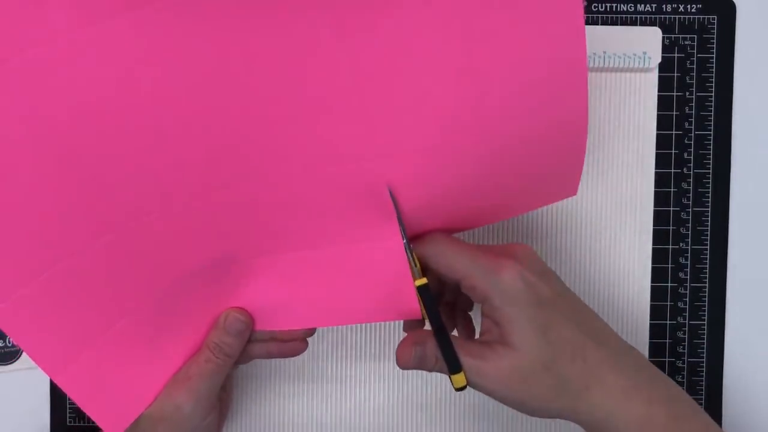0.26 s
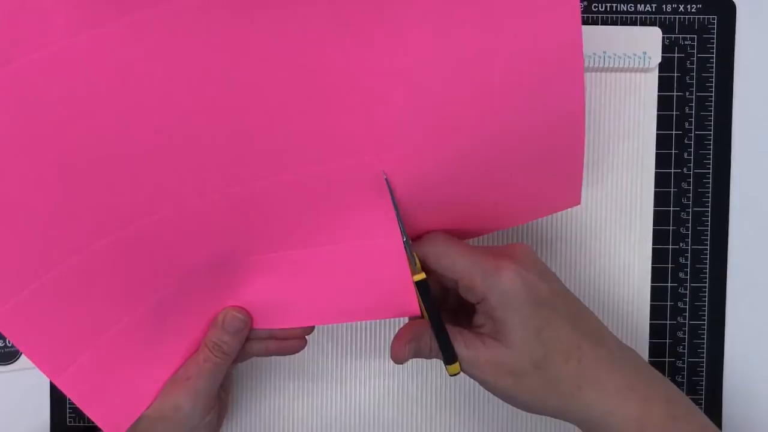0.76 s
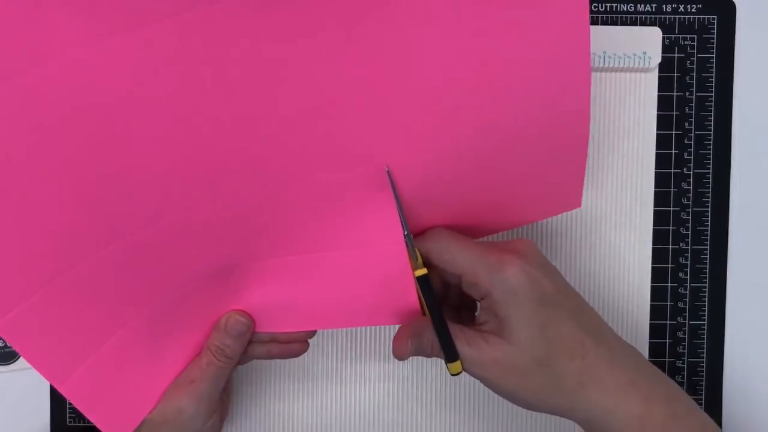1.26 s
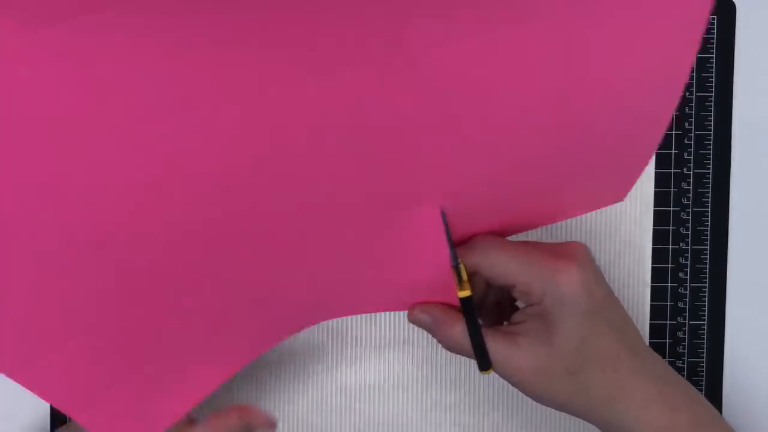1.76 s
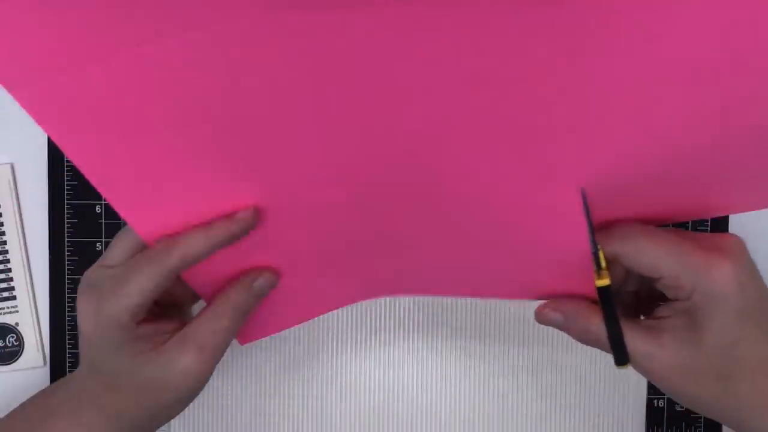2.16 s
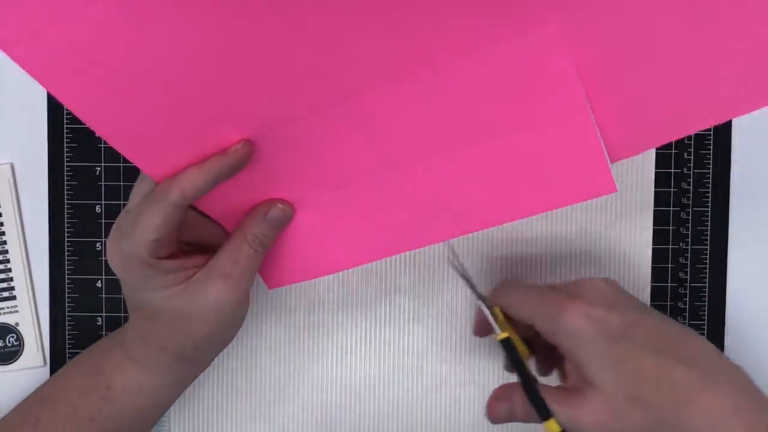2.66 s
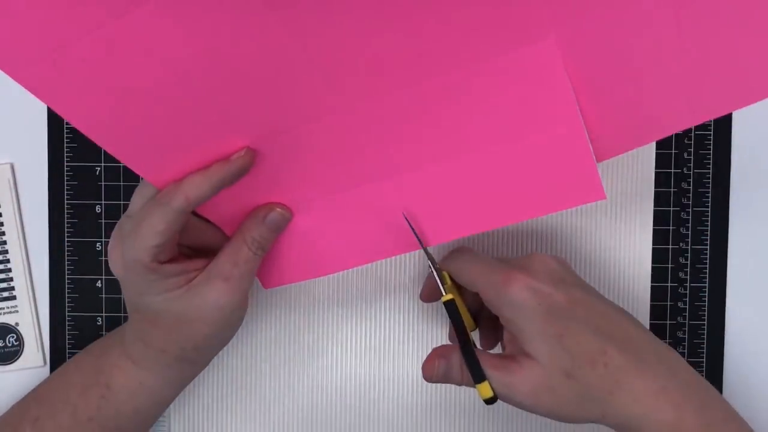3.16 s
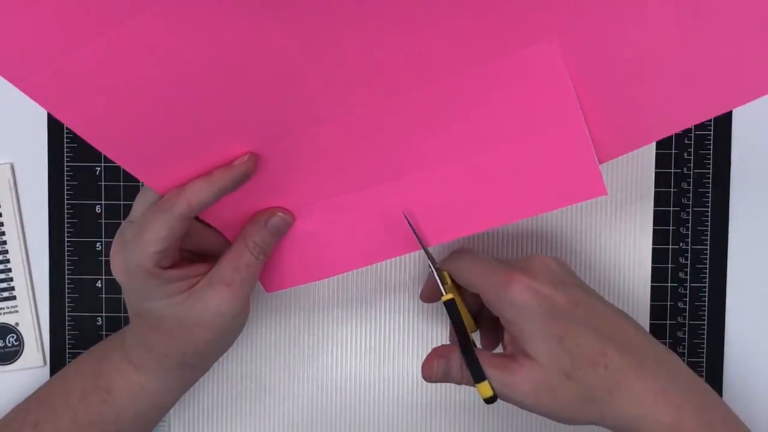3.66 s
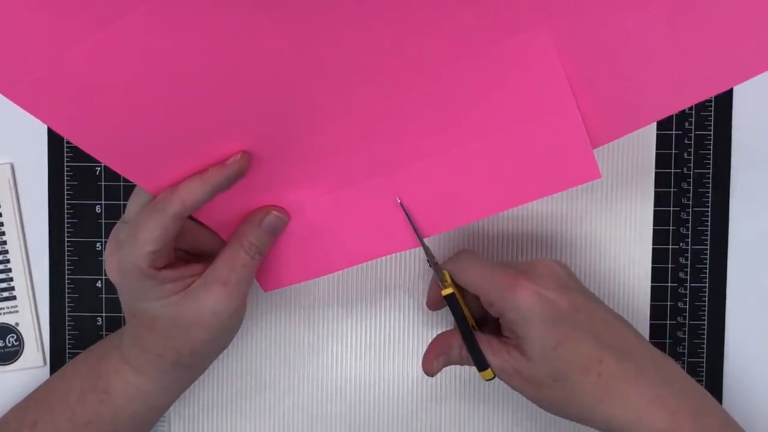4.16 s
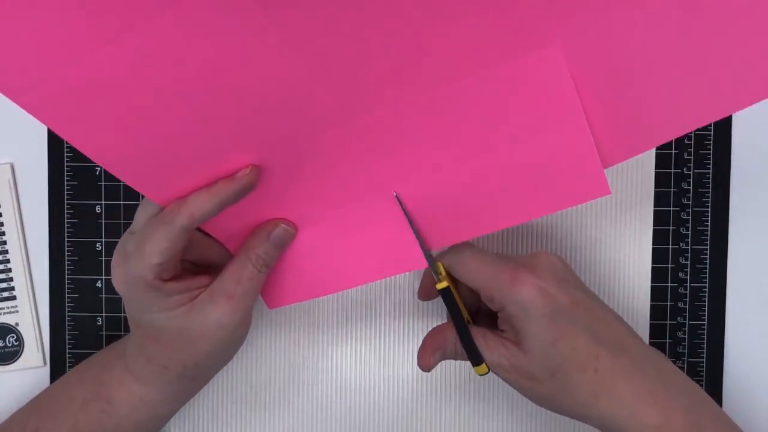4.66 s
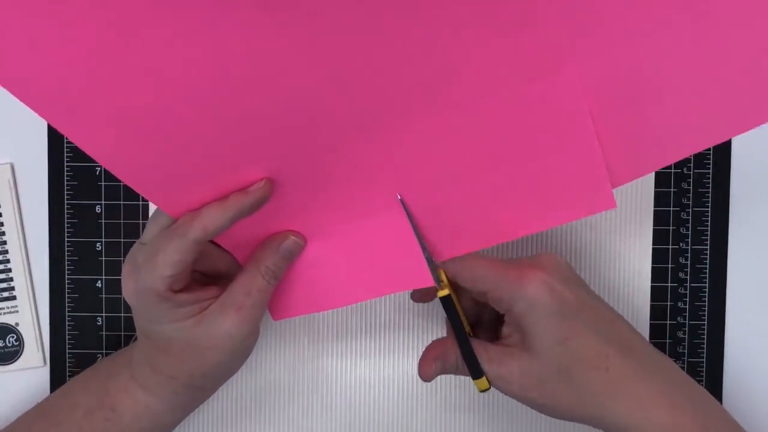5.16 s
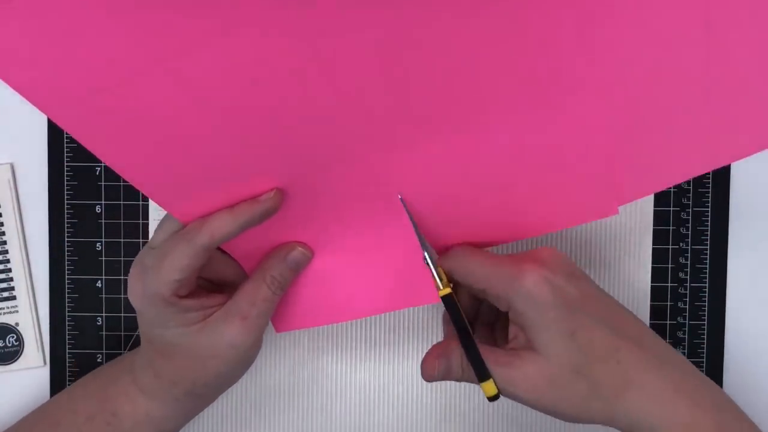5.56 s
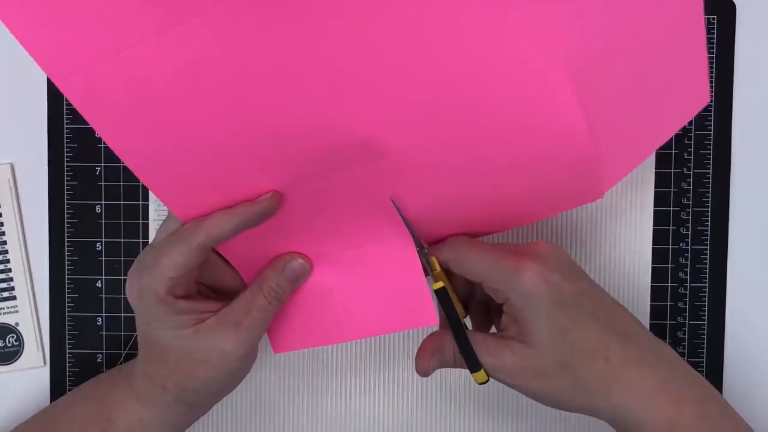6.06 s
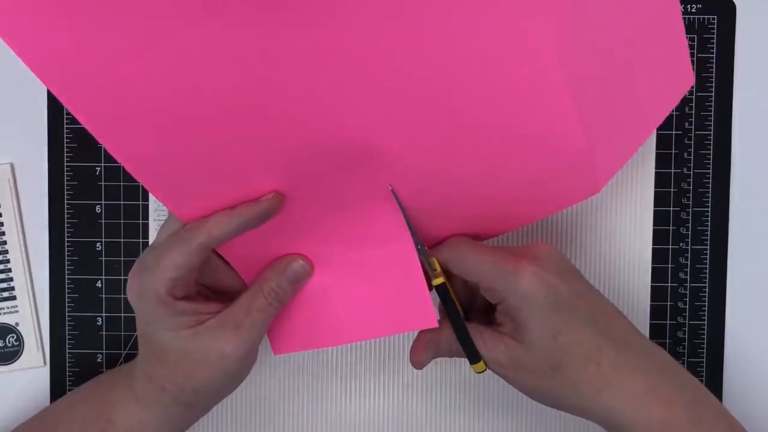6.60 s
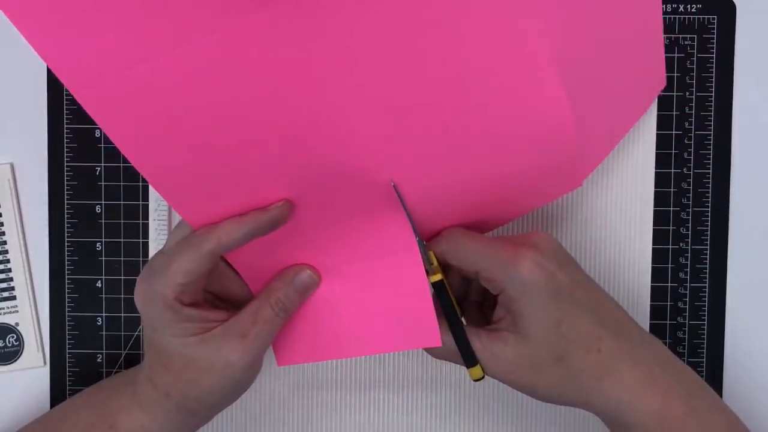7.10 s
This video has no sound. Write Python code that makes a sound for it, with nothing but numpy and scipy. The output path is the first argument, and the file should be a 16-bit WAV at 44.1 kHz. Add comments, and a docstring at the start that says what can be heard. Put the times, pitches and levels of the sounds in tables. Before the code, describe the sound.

Small scissors snip through stiff cardstock in short crunchy cuts, the sheet rustles and flaps as it is turned, then more snips, over faint hum.

```python
"""A craft table in a small room: small scissors cut a sheet of cardstock, heard close.
Cuts are filtered trains of fibre clicks; louder snaps add noise bursts and short bending waves of the sheet.
Between cuts the blades rub along the paper: coloured grain with blade resonances, scrapes and ringing clinks.
The sheet rustles as it is turned, its edge sings in narrow bands, and it flaps down and pops as it buckles.
A mains hum and a faint rush of air run underneath."""
import sys
import numpy as np
from scipy import signal
from scipy.fft import rfft, irfft
from scipy.io import wavfile
from scipy.ndimage import uniform_filter1d, map_coordinates

SR = 44100
rng = np.random.default_rng(int(sys.argv[2]) if len(sys.argv) > 2 else 0)


def int16_out(signal):
    """Quantize to a 16-bit WAV file."""
    q = np.round(np.clip(np.atleast_2d(signal).T, -1, 1) * 32767)
    wavfile.write(sys.argv[1], SR, q.astype(np.int16))


N = 323473
TIME = np.arange(N) / SR

# closing strokes of the blades: start_s, end_s, first_level_db, last_level_db
CUTS = [(0.796, 0.873, -37, -39.5), (1.379, 1.479, -38.5, -35), (1.521, 1.558, -32.5, -29.5),
        (4.02, 4.293, -54, -41.5), (4.613, 4.759, -46, -41.5), (5.082, 5.183, -42, -42.5),
        (6.575, 6.71, -45, -43)]
# relative spectrum of the paper's hiss: freq_hz, gain_db
HISS_SPECTRUM = [(1500, -32.5), (3800, 9.5), (6100, 10), (8500, 2), (12000, -0.5), (15500, -5)]


def undb(db):
    """Decibels to gain."""
    return 10 ** (np.asarray(db) / 20)


def unit(x):
    """Scale to rms 1."""
    return x / np.sqrt(np.mean(x ** 2))


def add(track, start_s, sound):
    """Mix a short sound in at start_s."""
    i = max(int(start_s * SR), 0)
    track[i:i + len(sound)] += sound[:N - i]


def colour(x, points):
    """Minimum-phase filter through (freq_hz, gain_db) points, made by folding the cepstrum."""
    point_hz, point_db = np.transpose(points)
    size = 4096
    log_hz = np.log(np.fft.rfftfreq(size, 1 / SR) + 1)
    log_gain = np.log(undb(np.interp(log_hz, np.log(point_hz), point_db)))
    cepstrum = irfft(log_gain)[:size // 2]
    cepstrum[0] /= 2
    impulse = irfft(np.exp(rfft(2 * cepstrum, size)))[:size // 2]
    return signal.fftconvolve(x, impulse)[:len(x)]


def ring(x, modes):
    """Decaying modes (freq_hz, t60_s, gain_db) driven by x, scaled to the level of x."""
    t = TIME[:SR // 4]
    body = sum(undb(db - 60 * t / t60_s) * np.sin(2 * np.pi * hz * t) for hz, t60_s, db in modes)
    return unit(signal.fftconvolve(x, body)[:N]) * np.std(x)


def walk(rate_hz):
    """Smoothed random steps with rms 1."""
    k = max(int(SR / rate_hz), 2)
    steps = np.repeat(rng.standard_normal(N // k + 1), k)
    return unit(uniform_filter1d(steps, k)[:N])


def fibres(rate_hz, spread_db, slip_rate_hz, slip_db):
    """Tiny clicks of paper fibres, their strength modulated by stick and slip."""
    clicks = (rng.random(N) < rate_hz / SR) * rng.choice([-1, 1], N)
    strength_db = spread_db * np.minimum(rng.exponential(size=N), 4)
    return clicks * undb(strength_db + slip_db * np.tanh(walk(slip_rate_hz)))


def flex(hz, rise_cycles, sag):
    """Bending wave in the sheet: swells and dies in a few cycles, higher notes first if sag > 0."""
    cycles = TIME[:SR // 25] * hz
    rise = cycles / rise_cycles
    phase = cycles * (1 - sag) + 2 * sag * rise_cycles * (1 - np.exp(-rise / 1.52))
    return (rise * np.exp(1 - rise)) ** 2 * np.sin(2 * np.pi * phase)


def nearness(s):
    """Nearness of the blades to the free edge of the sheet at time s, 0-1."""
    # time_s, nearness
    edge_points = [(2.4, 0.1), (2.9, 0.7), (5.2, 1), (6.6, 0.58)]
    return np.clip(np.interp(s, *np.transpose(edge_points)), 0, 1)


def stroke_gain(t, start_s, peak_s, end_s, bow=1):
    """Rubbing stroke: builds to its peak (late if bow is high), then dies ever faster, -12 dB at end_s."""
    rise = np.clip((t - start_s) / max(peak_s - start_s, .002), 0, 1)
    fall = np.maximum(t - peak_s, 0) / max(end_s - peak_s, .005)
    return rise ** bow * undb(-12 * np.minimum(fall, 4) ** 1.85)


def rubs(strokes, spectrum, grain, scatter, bow, scatter_s=0.0028):
    """Friction strokes; the bend of the card shifts the spectrum and gives each its own small resonances."""
    out, hiss = np.zeros(N), unit(colour(grain, HISS_SPECTRUM))
    t = TIME[:SR // 80]
    for start_s, peak_s, end_s, level_db, centre_hz, hiss_db in strokes:
        span = slice(max(int(start_s * SR), 0), int((2 * end_s - peak_s + 0.0069) * SR))
        # the lows follow the bend of the card, the highs stay put
        shifted = [(f * (centre_hz / 1500) ** (1 / (1 + (f / 3000) ** 2)), d) for f, d in spectrum]
        body = unit(colour(grain[span], shifted))
        stroke = undb(level_db) * body + undb(hiss_db) * hiss[span]
        stroke = stroke * stroke_gain(TIME[span], start_s, peak_s, end_s, bow)
        echoes = rng.standard_normal(len(t)) * np.exp(-t / scatter_s)
        echoes /= np.linalg.norm(echoes)
        add(out, start_s, stroke)
        add(out, start_s, scatter * signal.fftconvolve(stroke, echoes))
    return out


def bend(x, depth_db, rate_hz):
    """The card bends as it moves, so narrow bands swell and fade on their own."""
    size = 512
    overlap = size * 3 // 4
    hz, t, frames = signal.stft(x, SR, nperseg=size, noverlap=overlap)
    field = rng.standard_normal((64, 512))  # random gains over pitch and time
    place = np.meshgrid(6 * np.log2(1 + hz / 700), t * rate_hz, indexing="ij")
    gain = undb(depth_db * map_coordinates(field, place, mode="mirror"))
    shaped = signal.istft(frames * gain, SR, nperseg=size, noverlap=overlap)[1]
    return unit(shaped[:N]) * np.std(x)


def background():
    """Slowly wavering mains hum over the faint rush of the room; both dip briefly in the pause."""
    # hum partials: freq_hz, gain_db
    hum_partials = [(119.9, -61.5), (219, -75)]
    # relative spectrum of the rush: freq_hz, gain_db
    air_spectrum = [(25, -61), (50, -18.5), (140, -8), (400, -13), (1150, -23), (2100, -37.5), (15500, -64)]
    # background dip: time_s, gain_db
    dip = [(3.3, -0.5), (3.7, -13.5), (3.95, 1.5)]
    hum = np.zeros(N)
    for hz, db in hum_partials:
        tone = np.sqrt(2) * np.sin(2 * np.pi * (hz * TIME + rng.random()))
        hum += undb(db + .4 * walk(1.7)) * tone
    air = undb(-64.5) * unit(colour(rng.standard_normal(N), air_spectrum))
    return (hum + air) * undb(np.interp(TIME, *np.transpose(dip)))


def room(x, wet_db=-10.0, t60_mid_s=0.57, t60_broad_s=0.25, build_s=0.019):
    """Diffuse noise tail of a small room; the middle range outlasts the rest."""
    t = TIME[:int(.7 * SR)]
    noise = rng.standard_normal(len(t))
    # the hard walls return mostly the middle range
    mid = signal.sosfilt(signal.butter(1, [1200, 6500], "band", fs=SR, output="sos"), noise)
    mid = signal.sosfilt(signal.butter(8, 6300, fs=SR, output="sos"), mid)
    broad = undb(4.0) * rng.standard_normal(len(t))
    tail = mid * undb(-60 * t / t60_mid_s) + broad * undb(-60 * t / t60_broad_s)
    tail *= 1 - np.exp(-t / build_s)
    return undb(wet_db) * np.std(x) * unit(signal.fftconvolve(x, tail)[:N])


def handling():
    """The sheet flexes with a hollow, shifting rustle as it is turned and moved."""
    # relative spectrum of the rustling sheet: freq_hz, gain_db
    sheet_spectrum = [(60, -52), (150, -5), (480, 3), (800, 1), (1500, 1.5), (2300, -2), (4500, -25),
                      (11000, -52)]
    # rustle of the turning sheet: time_s, body_level_db, treble_level_db
    turn_levels = [(1.72, -66, -80), (1.846, -45, -58), (1.878, -61.5, -75.5), (1.912, -62.5, -60),
                   (1.968, -61, -65.5), (2.002, -68.5, -93), (2.022, -51.5, -57.5), (2.048, -53.5, -65),
                   (2.098, -62.5, -77.5), (2.23, -54, -63), (2.258, -55.5, -73.5), (2.352, -56, -72.5)]
    # hands shift the sheet and let it flap down:
    # start_s, length_s, level_db, centre_hz, hiss_re_level_db
    rustles = [(0, 0.34, -62, 826, -15.5), (0.195, 0.12, -52, 643, -27.5), (2.277, 0.086, -53.5, 520, -14),
               (2.385, 0.056, -38.5, 1073, -18), (2.437, 0.021, -46.5, 1620, -3),
               (2.543, 0.039, -58, 547, -40)]
    peak_share = 0.46
    grain = fibres(rate_hz=5500, spread_db=2.5, slip_rate_hz=140, slip_db=-0.5)
    creases = fibres(rate_hz=2800, spread_db=2.0, slip_rate_hz=93, slip_db=4.0)
    times_s, body_db, treble_db = np.transpose(turn_levels)
    turning = (TIME > times_s[0]) * (TIME < times_s[-1])
    body = undb(np.interp(TIME, times_s, body_db)) * unit(colour(creases, sheet_spectrum))
    treble = undb(np.interp(TIME, times_s, treble_db)) * unit(colour(creases, HISS_SPECTRUM))
    turn = turning * (body + treble)
    strokes = [(s, s + peak_share * length_s, s + length_s, db, hz, db + hiss_db)
               for s, length_s, db, hz, hiss_db in rustles]
    moved = rubs(strokes, sheet_spectrum, grain, scatter=0.47, bow=0.36)
    return bend(moved + turn, depth_db=3.5, rate_hz=38)


def skims():
    """Card edge drawn over a fine texture: a narrow, grainy band that follows the speed of the hand."""
    # start_s, length_s, level_db, first_hz, last_hz, width_over_first_hz
    skim_strokes = [(1.922, 0.066, -49.5, 2400, 1482, 0.6), (2.073, 0.17, -57, 4220, 4080, 0.3),
                    (2.366, .06, -37, 1143, 826, 0.26), (2.936, 0.15, -56, 2010, 1359, .35),
                    (4.42, 0.087, -39.5, 1472, 1310, 0.69)]
    peak_share = 0.6
    out, waver = np.zeros(N), 1 + 0.033 * walk(45)
    grain = fibres(rate_hz=13000, spread_db=0.0, slip_rate_hz=140, slip_db=1.5)
    for start_s, length_s, level_db, first_hz, last_hz, width in skim_strokes:
        end_s = start_s + length_s
        span = slice(int(start_s * SR), int((start_s + 1.8 * length_s) * SR))
        t = TIME[span]
        hz = np.interp(t, [start_s, end_s], [first_hz, last_hz]) * waver[span]
        lowpass = signal.butter(2, width * first_hz / 2, fs=SR, output="sos")
        band = signal.sosfilt(lowpass, grain[span])
        tone = unit(band * np.sin(2 * np.pi * np.cumsum(hz) / SR))
        gain = stroke_gain(t, start_s, start_s + peak_share * length_s, end_s, bow=.6)
        add(out, start_s, undb(level_db) * tone * gain)
    return out


def flutter():
    """The loose sheet slaps the table in quick, uneven, fading flaps, each with a higher wave on top."""
    start_s, median_gap_s = 2.496, 0.015
    first_db, fade_db_per_s, median_hz = -38, 89, 486
    out, s = np.zeros(N), start_s
    for gap, size, detune, overtone in rng.standard_normal((18, 4)):
        db = first_db - fade_db_per_s * (s - start_s) + 2 * size
        low_hz = median_hz * np.exp(.3 * detune)
        high_hz = 2.3 * median_hz * np.exp(.3 * overtone)
        add(out, s, undb(db) * flex(low_hz, rise_cycles=.8, sag=0.18))
        add(out, s, undb(db - 7) * flex(high_hz, rise_cycles=.9, sag=0.18))
        s += median_gap_s * np.exp(.5 * gap)
    return out


def pops():
    """The stiff sheet flips through a buckle with a click and one short falling note."""
    # sheet buckles or is bumped: time_s, peak_db, pitch_hz, click_db
    buckles = [(1.85, -44, 1350, -34.5), (1.976, -37.5, 1050, -57), (2.3668, -29, 1105, -42),
               (2.502, -33.5, 354, -49), (3.334, -52.5, 860, -58), (3.783, -55, 1040, -62.5),
               (4.974, -27, 1894, -67), (5.2842, -25.5, 920, -27.5), (5.3876, -30, 806, -42),
               (5.965, -33.5, 1150, -56), (6.0608, -28, 830, -48), (6.2149, -31, 1150, -62),
               (6.977, -38.5, 1550, -64)]
    out = np.zeros(N)
    for s, peak_db, hz, click_db in buckles:
        add(out, s, undb(peak_db) * flex(hz, rise_cycles=0.97, sag=0.29))
        add(out, s - .0004, undb(click_db) * flex(hz * 2.7, rise_cycles=0.94, sag=0.31))
    return out


def clinks():
    """Steel knocks on steel and the scissors ring in decaying modes."""
    # blade knocks: time_s, level_db
    knocks = [(2.367, -34.5), (5.722, -31), (5.738, -34.5)]
    # free ring of the scissors: freq_hz, t60_s, gain_db
    scissor_modes = [(889, .1, -3.5), (2070, 0.06, -4.5), (2290, 0.045, -3.5), (6300, 0.057, -25.5)]
    out, t = np.zeros(N), TIME[:SR // 4]
    for s, level_db in knocks:
        tone = np.zeros(len(t))
        for hz, t60_s, db in scissor_modes:
            tone += undb(db - 60 * t / t60_s) * np.sin(2 * np.pi * (hz * t + rng.random()))
        onset = 1 - np.exp(-t / .001)
        add(out, s, undb(level_db) * tone / np.abs(tone).max() * onset)
    return out


def slides():
    """Steel rubs on steel and the cut edge: a rasp that rings the blades; glides swell, scrapes start fast."""
    # relative spectrum of the rasp: freq_hz, gain_db
    rasp_spectrum = [(60, -39.5), (250, -7), (700, 1), (1200, 4.5), (2500, -1), (3600, -8), (5200, -20.5),
                     (6400, -32), (9000, -52)]
    # blades open or glide on along the slit: start_s, length_s, level_db, centre_hz, hiss_re_level_db
    glide_strokes = [(0.711, 0.098, -51, 942, -16.5), (0.963, 0.079, -48.5, 1100, -12.5),
                     (1.164, 0.083, -59, 1300, -20), (3.816, 0.29, -47.5, 1540, -27),
                     (4.355, 0.17, -44.5, 1650, -13.5), (4.838, 0.14, -43, 1746, -21),
                     (5.425, 0.12, -53, 1630, -18), (5.703, 0.05, -45, 1406, -14),
                     (5.88, 0.089, -57.5, 1940, -10.5), (6.477, 0.044, -50, 1490, -18),
                     (6.856, 0.13, -53, 1550, -16), (6.937, 0.25, -56.5, 1310, -13.5)]
    # a blade catches on the card and scrapes off it: start_s, length_s, level_db, centre_hz
    scrape_strokes = [(0.422, 0.08, -60.5, 740), (2.361, 0.025, -34, 1188), (2.927, 0.15, -49, 2486),
                      (3.09, 0.044, -57, 2390), (3.167, 0.022, -55.5, 2190), (5.278, 0.041, -45, 1200),
                      (5.39, 0.018, -48.5, 1500), (6.08, 0.15, -59, 1326), (6.203, 0.035, -43, 1020),
                      (6.427, 0.025, -56.5, 1126)]
    # sliding blade resonances: freq_hz, t60_s, gain_db
    blade_modes = [(1550, 0.011, -5), (2150, 0.026, -2), (2220, 0.019, 2.5)]
    glide_peak_share, scrape_attack_s, scrape_hiss_db = 0.48, 0.0042, -24
    glides = [(s, s + glide_peak_share * length_s, s + length_s, db, hz, db + hiss_db)
              for s, length_s, db, hz, hiss_db in glide_strokes]
    scrapes = [(s, s + scrape_attack_s, s + length_s, db, hz, db + scrape_hiss_db)
               for s, length_s, db, hz in scrape_strokes]
    grain = fibres(rate_hz=8000, spread_db=3.0, slip_rate_hz=280, slip_db=4.0)
    rasp = rubs(glides + scrapes, rasp_spectrum, grain, scatter=0.5, bow=0.6)
    return bend(rasp + undb(-13) * ring(rasp, blade_modes), depth_db=2, rate_hz=30)


def snaps(crack_s=0.0025, lead_s=0.0028, rebound_s=0.00328, rebound_db=-3.0, dull_db=-7, muffle_db=-5):
    """Fibre bundles break in a crackle and kick the sheet; the crackle brightens as the blades close."""
    # card gives way under the blades: time_s, strength_db, pitch_hz
    breaks = [(.785, -35.5, 856), (.815, -28.5, 838), (.838, -28.5, 780), (.866, -37.5, 850),
              (1.437, -30.5, 710), (1.474, -31.5, 782), (1.491, -24.5, 870), (1.511, -23, 772),
              (1.529, -22.5, 900), (1.535, -25, 754), (1.553, -24, 594), (3.862, -42, 1400),
              (4.034, -42.5, 1200), (4.064, -38, 1050), (4.078, -40.5, 1000), (4.101, -41.5, 1150),
              (4.117, -41.5, 1300), (4.148, -41.5, 1250), (4.171, -33.5, 1150), (4.184, -39, 1100),
              (4.201, -31.5, 1050), (4.212, -33.5, 1050), (4.229, -29.5, 1060), (4.247, -30.5, 1255),
              (4.265, -26.5, 1280), (4.287, -33.5, 950), (4.597, -38, 980), (4.635, -35.5, 1070),
              (4.661, -30.5, 1040), (4.67, -31.5, 945), (4.69, -33.5, 1036), (4.708, -29.5, 1048),
              (4.714, -28.5, 907), (4.735, -26.5, 980), (5.101, -28.5, 900), (5.12, -29, 855),
              (5.131, -31.5, 840), (5.14, -28.5, 1286), (5.162, -29, 1140), (5.175, -35, 1050),
              (5.188, -34, 960), (6.561, -36, 893), (6.604, -33, 790), (6.626, -36, 780), (6.663, -28, 910),
              (6.67, -25.5, 791), (6.684, -33, 900), (6.703, -32.5, 657), (6.735, -29.5, 713)]
    # relative spectrum of the crackle: freq_hz, gain_db
    crack_spectrum = [(700, -16), (1800, 14.5), (3200, 8), (5100, -5), (7200, -12.5), (12000, -15),
                      (15500, -20)]
    crack_db, crack_edge_db = -17, 8.5  # re strength; the second is gained near the edge
    out, t = np.zeros(N), TIME[:SR // 40]
    for s, db, hz in breaks:
        overtone, path = rng.standard_normal(2)
        start_s, end_s = next(cut[:2] for cut in CUTS if s < cut[1] + .1)
        jaw_opening = np.interp(s, [start_s, end_s], [1, 0])
        near, kick_s = nearness(s), s - lead_s
        add(out, kick_s, undb(db + 1.5) * flex(hz, rise_cycles=1.6, sag=0.044))
        # the wave comes back from the edge of the sheet, a little lower
        return_s = kick_s + rebound_s * np.exp(.2 * path)
        add(out, return_s, undb(db + rebound_db) * flex(.9 * hz, rise_cycles=1.3, sag=0))
        # a second, higher wave runs through the sheet with it
        high_hz = hz * (1.66 + 0.047 * overtone)
        add(out, kick_s, undb(db - 3) * flex(high_hz, rise_cycles=1.4, sag=0.14))
        # deep in the sheet the card muffles the crackle below 4 kHz
        spectrum = [(f, d + dull_db * jaw_opening * f / (f + 6000) + muffle_db * (1 - near) * (f < 4000))
                    for f, d in crack_spectrum]
        crackle = rng.standard_normal(len(t)) * t / crack_s * np.exp(-t / crack_s)
        burst = colour(crackle, spectrum)
        burst /= np.std(burst[:SR // 200])
        add(out, kick_s, undb(db + crack_db + crack_edge_db * near) * burst)
    return out


def crunch():
    """The closing blades shear fibres; deep in the sheet the card sounds lower than near its edge."""
    # relative spectra deep in the sheet and near its edge: freq_hz, gain_db
    deep_spectrum = [(100, -48), (220, -27.5), (400, -12), (500, 2.5), (800, 1), (1150, -4), (2400, -20.5),
                     (3500, -27), (9000, -37), (15500, -62)]
    edge_spectrum = [(100, -40), (220, -13.5), (550, -6.5), (1050, -1), (1600, -13.5), (3100, -13.5),
                     (5800, -29.5), (15500, -49.5)]
    bite_s = 0.0033  # the blades take hold of the card and let go
    deep_grain = fibres(rate_hz=6000, spread_db=1.5, slip_rate_hz=200, slip_db=0.5)
    edge_grain = fibres(rate_hz=4600, spread_db=2.5, slip_rate_hz=220, slip_db=8.0)
    deep = unit(colour(deep_grain, deep_spectrum))
    edge = unit(colour(edge_grain, edge_spectrum))
    force = np.zeros(N)
    for start_s, end_s, first_db, last_db in CUTS:
        level = undb(np.interp(TIME, [start_s, end_s], [first_db, last_db]))
        force += level * (TIME > start_s) * (TIME < end_s)
    force = uniform_filter1d(force, max(int(bite_s * SR), 1))
    near = nearness(TIME)
    return force * (np.sqrt(1 - near) * deep + np.sqrt(near) * edge)


def scene():
    """Cutting and buckling set the whole sheet ringing; all but the background feeds the room."""
    # sheet resonances: freq_hz, t60_s, gain_db
    sheet_modes = [(339, 0.07, 2), (786, 0.05, -3), (940, 0.03, 1)]
    card = crunch() + snaps() + pops()
    sheet = card + undb(-17.0) * ring(card, sheet_modes)
    dry = sheet + flutter() + slides() + clinks() + skims() + handling()
    return (dry + room(dry) + background())[None]


def record(dry):
    """The recorder cuts the deep bass and, steeply, the top."""
    thin = signal.sosfilt(signal.butter(4, 46, "high", fs=SR, output="sos"), dry)
    return signal.sosfilt(signal.ellip(10, .2, 70, 15600, fs=SR, output="sos"), thin)


dry = scene()
out = record(dry)
int16_out(out)
```